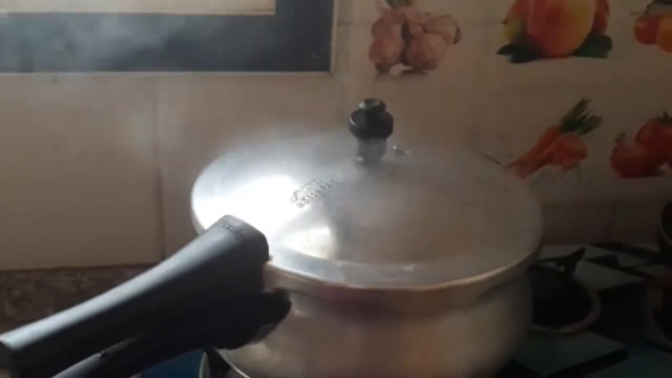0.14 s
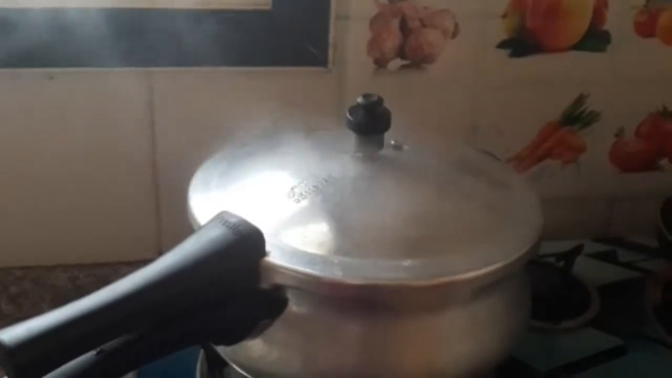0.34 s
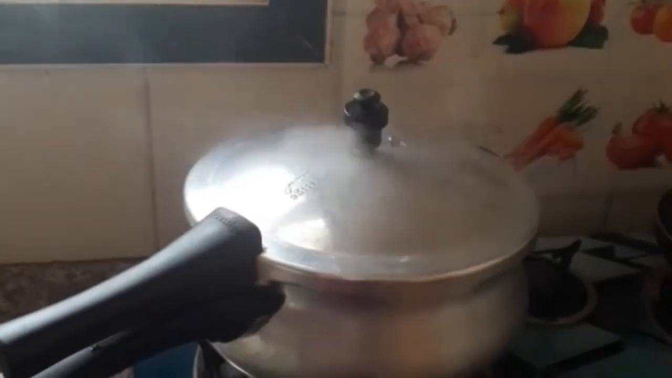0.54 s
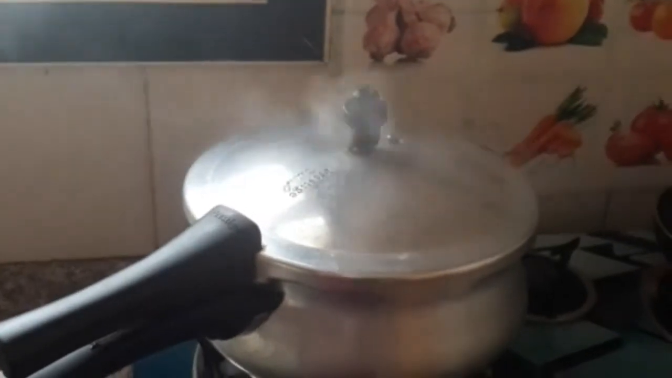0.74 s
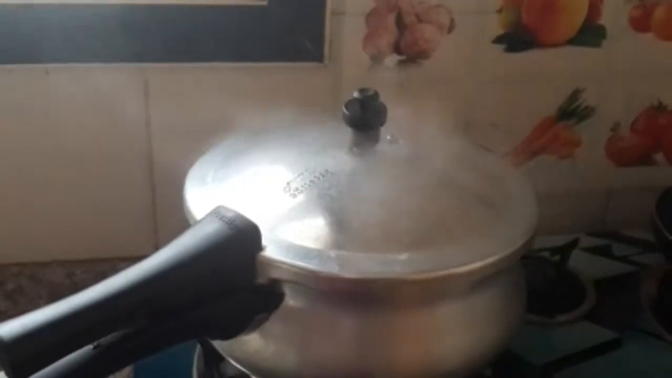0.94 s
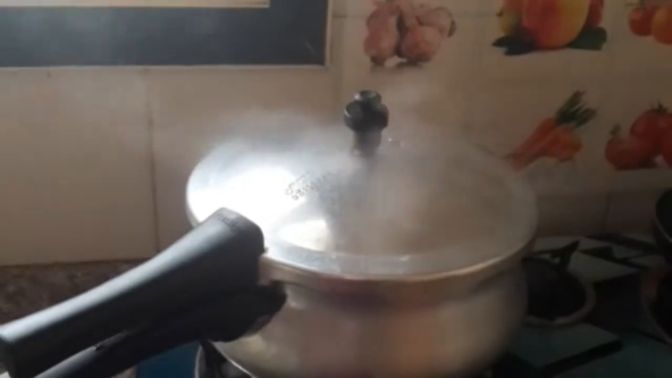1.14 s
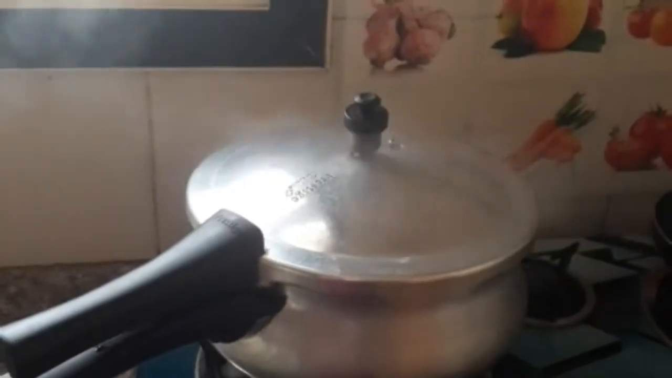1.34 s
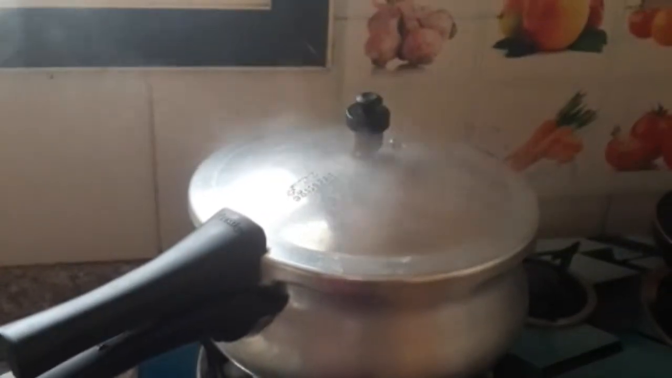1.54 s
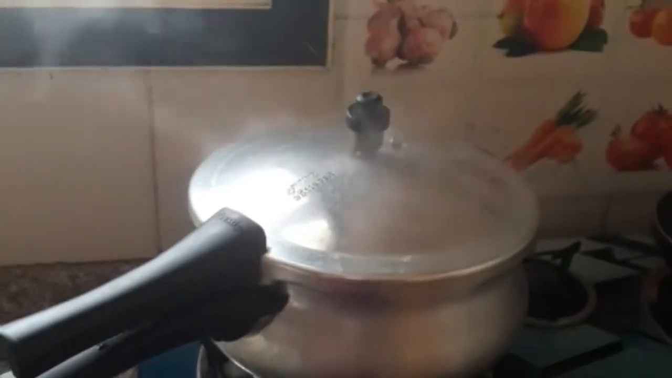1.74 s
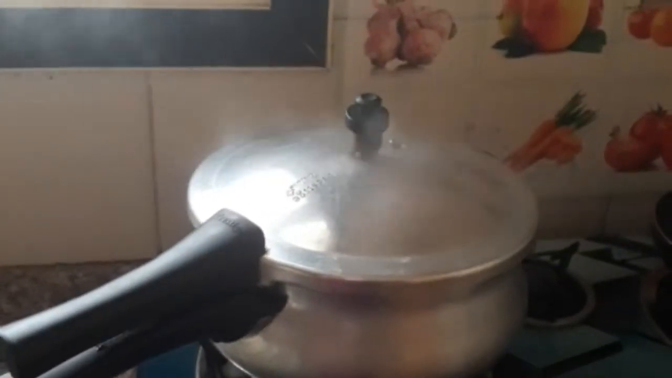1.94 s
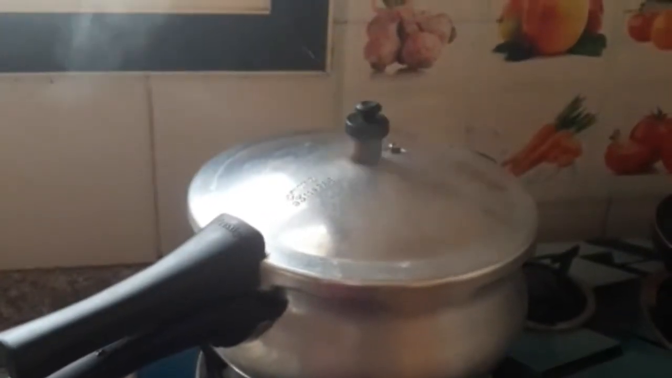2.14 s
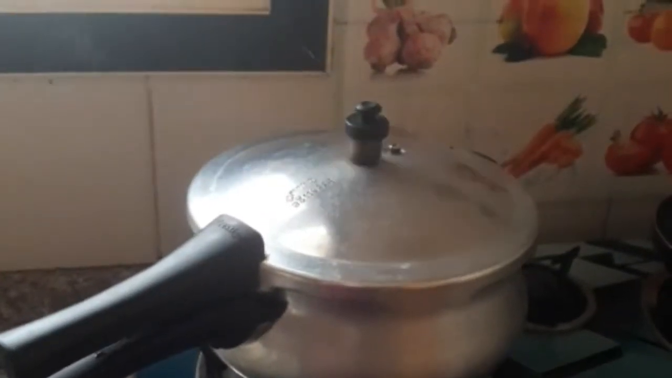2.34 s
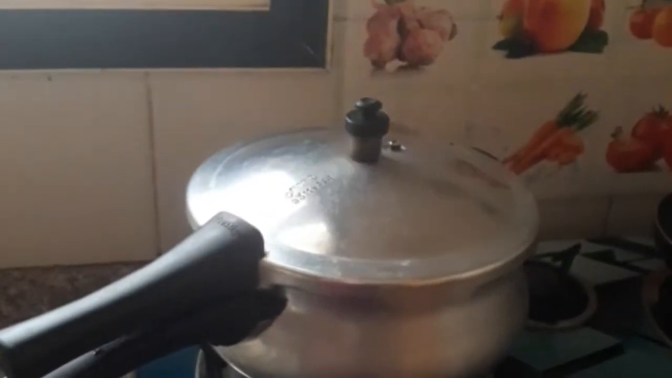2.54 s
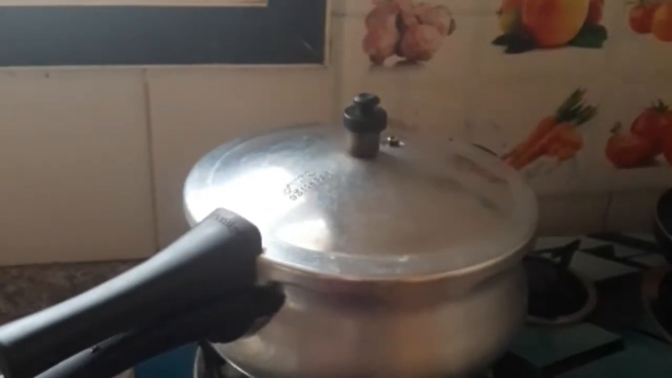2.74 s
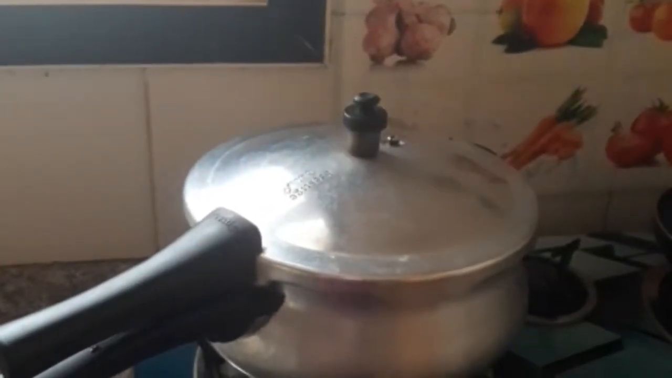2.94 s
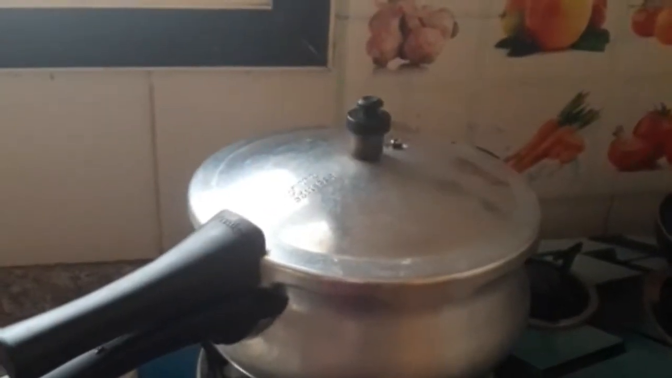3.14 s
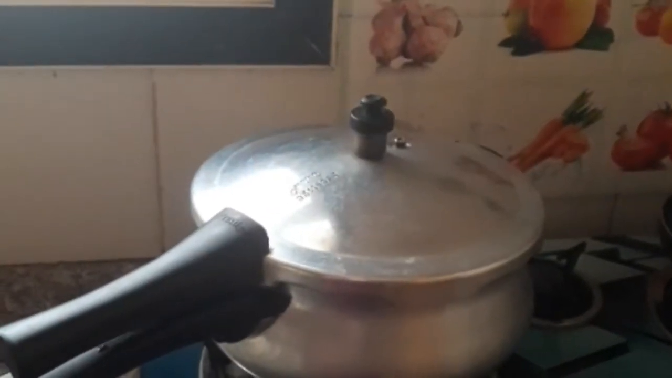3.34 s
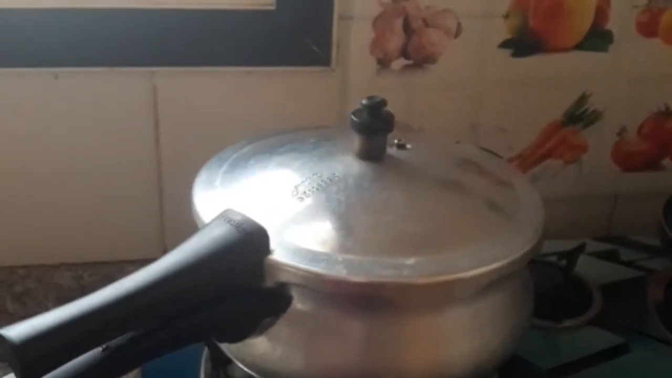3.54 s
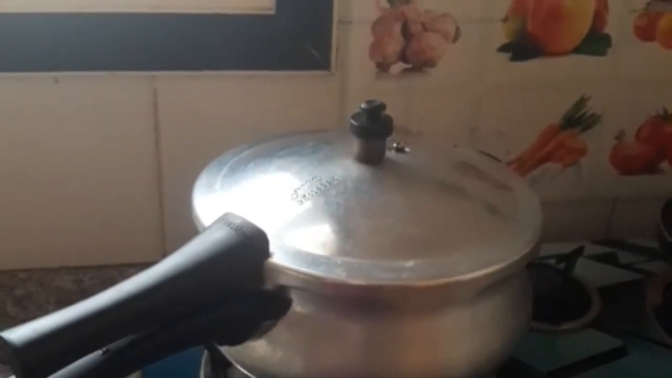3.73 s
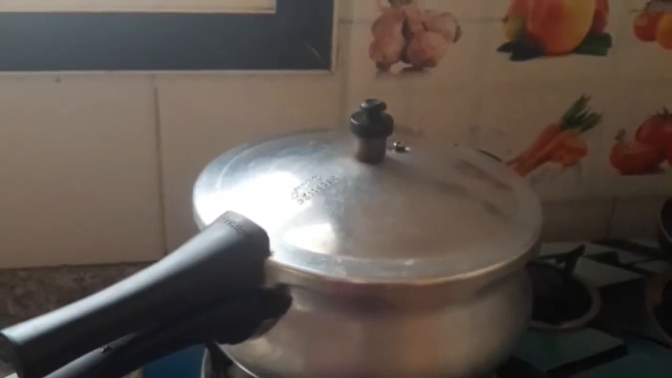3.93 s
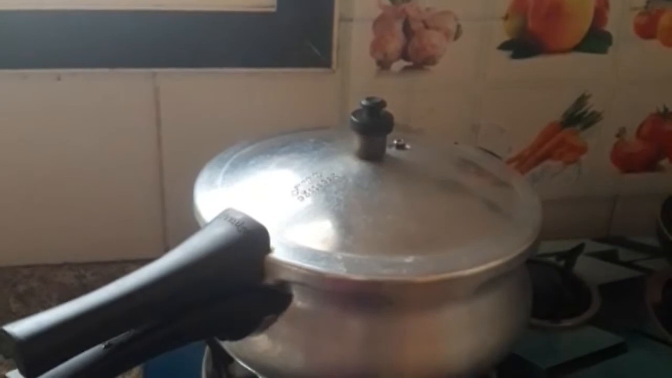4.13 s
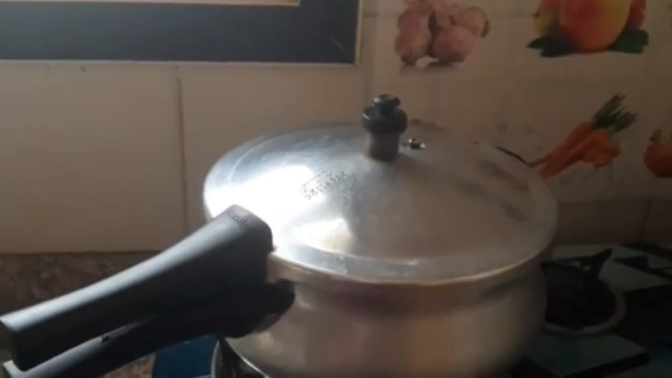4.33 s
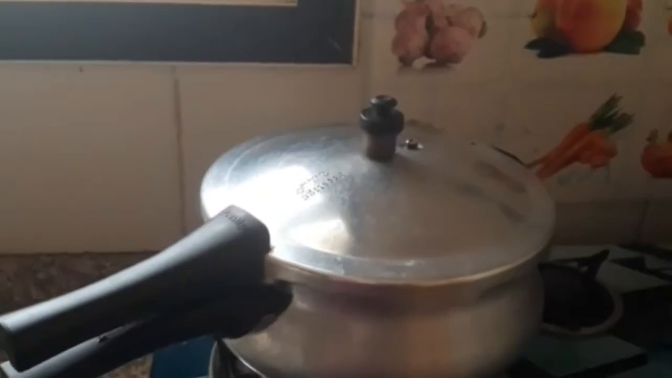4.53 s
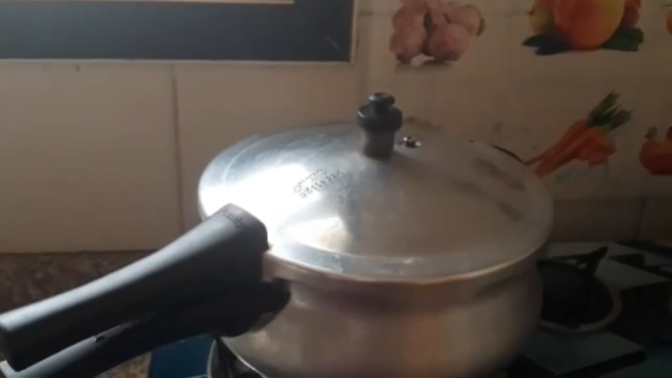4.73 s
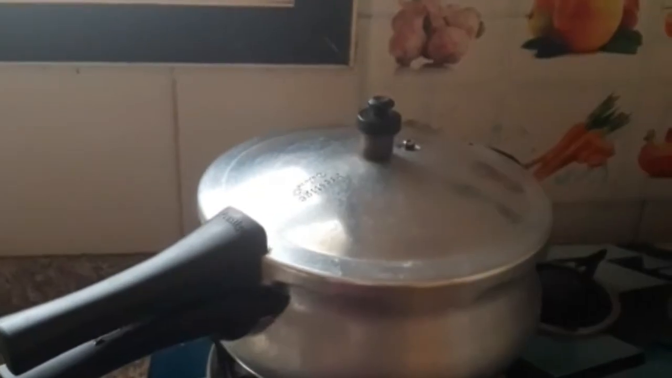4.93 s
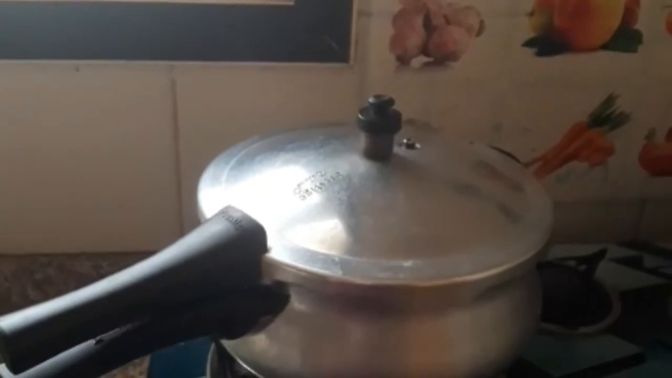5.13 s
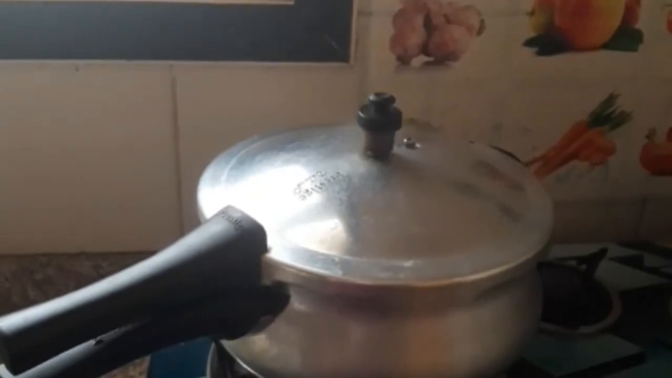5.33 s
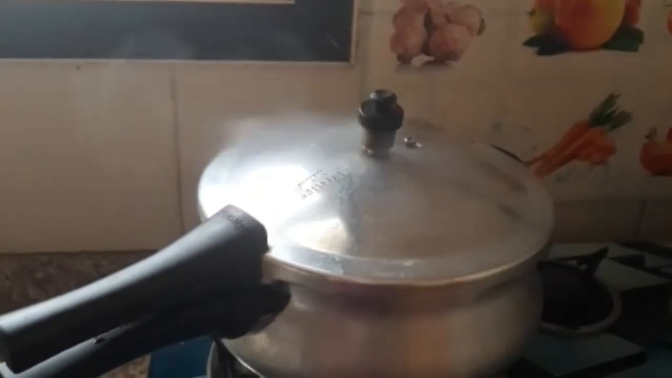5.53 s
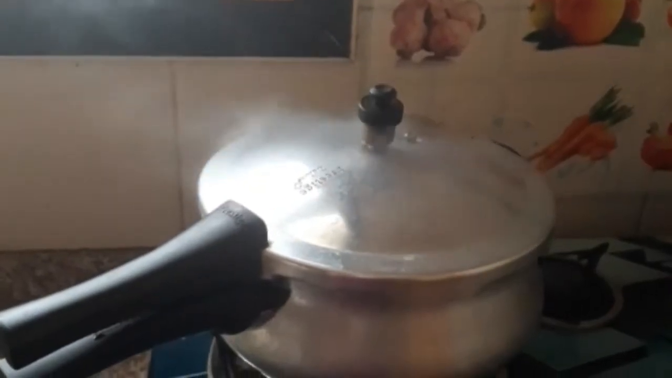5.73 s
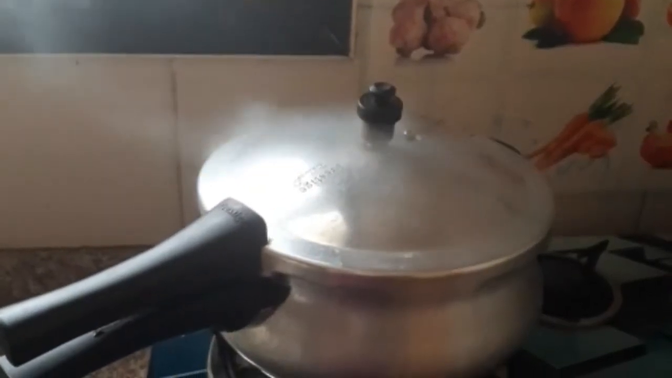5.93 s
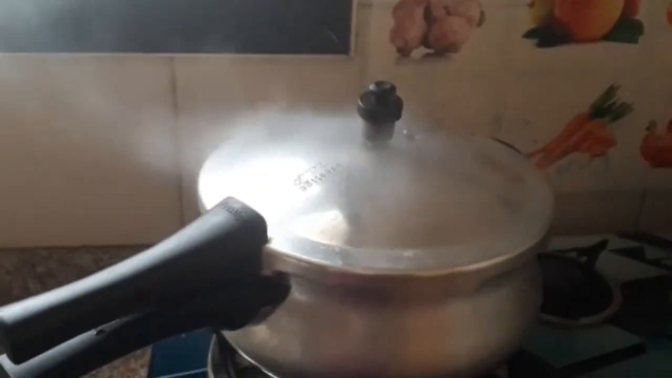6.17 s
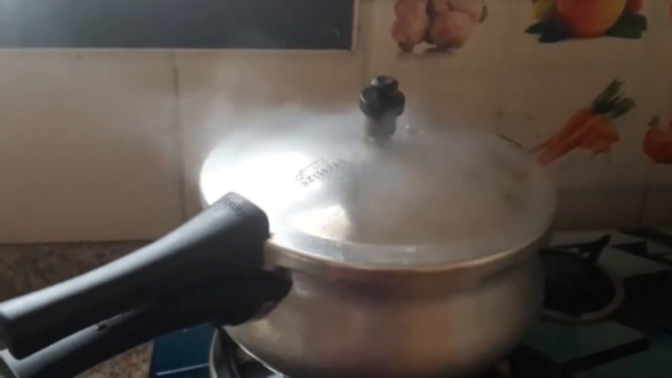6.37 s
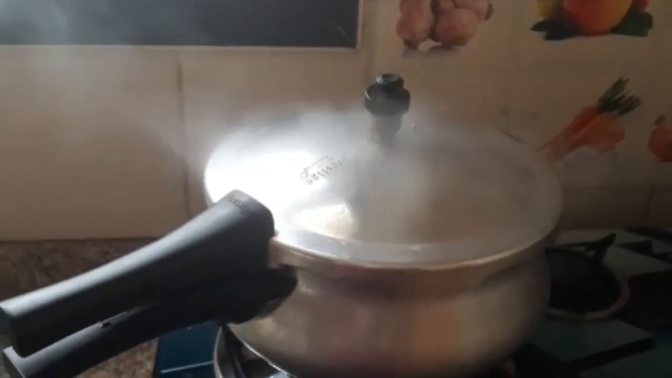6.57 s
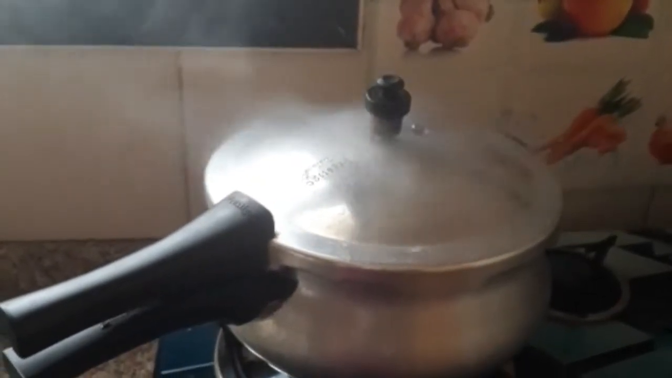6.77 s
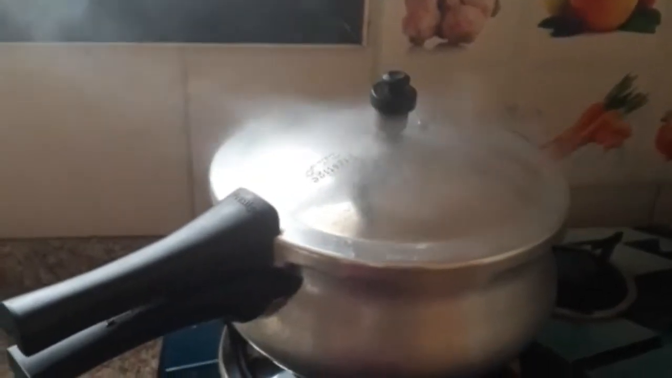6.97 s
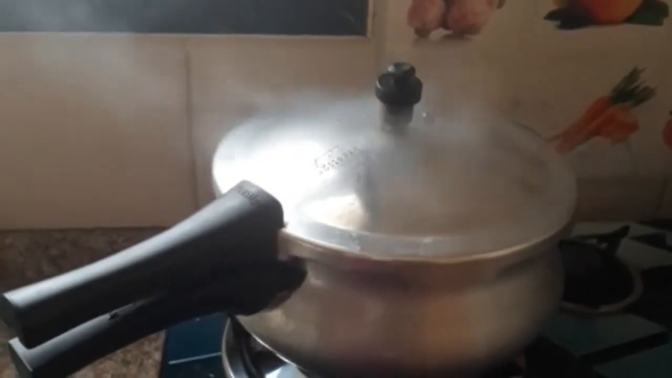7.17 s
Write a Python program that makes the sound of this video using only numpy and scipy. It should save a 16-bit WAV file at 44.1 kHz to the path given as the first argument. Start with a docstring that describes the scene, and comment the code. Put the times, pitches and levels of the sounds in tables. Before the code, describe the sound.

A stovetop pressure cooker blasts steam with a loud, hissing roar and a breathy whistle. The jet shuts off with a brief hoot and a puff, leaving a quiet simmer and a faint motor hum. A thin, wet hiss builds, then the jet bursts out again and keeps roaring, while droplets thump softly on the microphone, an arm's length away in a small tiled kitchen.

```python
"""A pressure cooker blows off steam in a small tiled kitchen. At first a turbulent jet roars through the
gaps of the vent weight, whose cavities resonate in a breathy whistle. Near 2 s the weight sinks with a
hoot and a puff, leaving the pot simmering over the burner and a faint motor hum. At 4.3 s wet steam
starts to leak under the weight; at 5.4 s it lifts again, and the jet roars to the end, spitting
droplets that thump on a microphone an arm's length away."""
import sys
import numpy as np
from scipy import signal
from scipy.fft import rfft, irfft
from scipy.io import wavfile
from scipy.ndimage import uniform_filter1d

SR = 44100
rng = np.random.default_rng(int(sys.argv[2]) if len(sys.argv) > 2 else 0)


def store_pcm(level_fs):
    """Save levels as 16-bit WAV."""
    pcm = np.round(np.clip(level_fs, -1, 1) * 32767).astype(np.int16)
    wavfile.write(sys.argv[1], SR, np.atleast_2d(pcm).T)


N = 317520
TIME = np.arange(N) / SR
FREQ = np.maximum(np.arange(N // 2 + 1) * SR / N, 1)

# lifts of the weight: open t/s, sinking t/s, jet level/dB,
# then relative to the jet: spray/dB, low rush/dB, treble tilt/dB, whistle/dB, tube tone/dB
LIFTS = [(-.6, 2.0585, -15.5, -20, -30, -1, -8, -16), (5.373, 7.5, -15, -15.5, -25, 0.6, -14, -18.5)]
# surges let out by the rocking weight: t/s, extra jet/dB, extra whistle/dB, extra tube tone/dB
SURGES = [(.03, 0.2, 0, 2), (1.14, 1.7, .3, 2), (1.58, 1.3, -1, 1.5), (1.93, 0.96, 2, 4.5),
          (6.35, 0.5, 2, -3), (7.19, 1.2, -1, -1)]
# hoots as the weight drops or the pressure sags, one per lift:
# peak t/s, level/dB, rise/(dB/s), fall/(dB/s), f/Hz, width/Hz
HOOTS = [(2.043, -28.5, 700, 100, 2190, 160), (7.05, -35.5, 3.5, 5, 2270, 259.5)]
# turbulence spectra: f/Hz, relative spectral level/dB
JET_SPECTRUM = [(20, -15.5), (100, -13), (400, -10.5), (1000, -10), (1700, -7.5), (3000, -4), (5000, -2),
                (7600, -0.5), (9600, -0.5), (11800, 0), (14000, -2.5), (16000, -5)]
LEAK_SPECTRUM = [(30, -26), (400, -5), (900, -10.5), (1700, 0.5), (3200, 0.5), (4700, -2.5), (7500, 3),
                 (10000, -1), (14000, 0.5), (16000, -9)]
SIMMER_SPECTRUM = [(25, -24), (40, 0), (60, 1.5), (130, -3), (230, 3), (450, -0.5), (950, -6), (1600, 1.5),
                   (2200, -1), (3000, -7), (4800, -8), (7200, -6), (10000, -10), (16000, -16)]
# resonances: f/Hz, width/Hz, level/dB relative to the turbulence
WEIGHT_MODES = [(1760, 290, -1.5), (2940, 350, -6.5), (7030, 250, 1.5), (8440, 370, 6), (8850, 280, 7),
                (9150, 270, 3), (10300, 450, -1.5)]
LEAK_MODES = [(3200, 350, -2), (4020, 500, 0), (5560, 340, 10), (5880, 290, 12.5), (6260, 320, 8.5),
              (8550, 600, 1.5), (11150, 500, 0)]
SIMMER_MODES = [(1660, 120, -7), (3800, 510, 7), (4010, 140, 12), (5560, 400, 3), (6150, 450, 7),
                (8700, 470, 4.5)]
# gap resonances of the whistle: f/Hz, width/Hz, relative level/dB
WHISTLE_MODES = [(5760, 500, -2.5), (6080, 240, 1), (6410, 290, -0.5)]
# droplet impacts: t/s, relative level/dB, push length/ms, direction (+1 or -1)
DROP_IMPACTS = [(5.4553, -21, 0.86, 1), (5.4923, -18, 0.61, 1), (5.599, -23, 1.2, 1),
                (5.638, -8.5, 0.66, 1), (5.9303, -10.5, 0.68, -1), (5.9709, -18, 0.55, 1),
                (6.1427, -12, 0.23, 1), (6.3878, -15, 0.46, 1), (6.407, -19.5, .8, -1),
                (6.5476, -18.5, 0.61, 1)]
# tones of a small motor in the room: f/Hz, level/dB relative to the simmering noise
MOTOR_TONES = [(167, -21), (231.5, -23), (587, -26)]
# early reflections from the lid and wall tiles: delay/ms, relative gain
REFLECTIONS = [(1.35, 0.03), (2.6, 0.038), (4.3, 0.049)]

OPEN_DB_PER_S, CLOSE_DB_PER_S = 288, 202  # slopes as the vent opens and is throttled


def vent():
    """Relief valve: at each lift one flow drives jet, whistle and tube tone; a hoot and puff join in."""
    out = 0
    for lift, hollow in zip(LIFTS, HOOTS):
        open_s, sink_s, jet_db, spray_db, rush_db, tilt_db, whistle_db, tube_db = lift
        # the whistle flares as the rising weight passes the gap that sings best
        flare_db = 10.5 * bump(open_s + .005, width_s=0.033)
        whistle = undb(whistle_db + flare_db) * surge(column=2) * vent_tone(WHISTLE_MODES, waver_db=0)
        tube = undb(tube_db) * surge(column=3) * vent_tone([(3920, 520, 0)], waver_db=0.5)
        blast = undb(jet_db) * flow(open_s, sink_s) * (jet(spray_db, rush_db, tilt_db) + whistle + tube)
        seated_s = sink_s + 0.12
        lifted = swell(open_s, OPEN_DB_PER_S, CLOSE_DB_PER_S, hold_s=seated_s - open_s)
        out = out + blast + lifted * hoot(*hollow) + puff(peak_s=sink_s + 0.055, level_db=-31.5)
    return out


def jet(spray_db, rush_db, tilt_db):
    """Jet noise: turbulence and spray excite the weight's cavities; large eddies add a low rush."""
    source = turbulence(flutter_db=0.85, flutter_hz=70) + undb(spray_db) * spray(per_s=2500, spread_db=6)
    tilt = spectrum([(4000, 0), (14000, tilt_db)])  # a higher lift lets out more treble
    roar = shaped(source, spectrum(JET_SPECTRUM) * tilt * (1 + resonance(WEIGHT_MODES)))
    rush = shaped(turbulence(flutter_db=5, flutter_hz=45), resonance([(220, 1500, 0)]))
    return roar + undb(rush_db) * rush


def flow(open_s, sink_s, sag_db_per_s=.5):
    """Valve transient: the jet's gain overshoots, sags with the pressure and is throttled shut."""
    opening = swell(open_s, OPEN_DB_PER_S, CLOSE_DB_PER_S, hold_s=sink_s - open_s)
    overshoot_db = 2.5 * bump(open_s + 0.042, width_s=0.027)
    sag_db = sag_db_per_s * np.maximum(TIME - open_s, 0)
    return opening * undb(overshoot_db - sag_db) * surge(column=1)


def surge(column):
    """Amplitude modulation by the rocking weight: gain of jet (column 1), whistle (2) or tube (3)."""
    return undb(sum(row[column] * bump(row[0], width_s=0.12) for row in SURGES))


def vent_tone(modes, waver_db):
    """Forced resonance: turbulence drives a breathy tone, which wavers by waver_db as the weight rocks."""
    tone = shaped(turbulence(flutter_db=1.2, flutter_hz=48), resonance(modes))
    return tone * undb(waver_db * walk(6.4))


def hoot(peak_s, level_db, rise_db_per_s, fall_db_per_s, hz, width_hz):
    """Cavity resonance: steam blows across the hollow of the weight."""
    tone = shaped(rng.standard_normal(N), resonance([(hz, width_hz, 0)]))
    return undb(level_db) * tone * swell(peak_s, rise_db_per_s, fall_db_per_s)


def puff(peak_s, level_db):
    """Throttling: the slowing jet loses its treble and turns hollow."""
    power = resonance([(750, 340, -2), (1300, 560, 1.5), (2500, 4500, -5.5)])
    breath = shaped(turbulence(flutter_db=4, flutter_hz=37), power)
    return undb(level_db) * breath * swell(peak_s, rise_db_per_s=130, fall_db_per_s=132)


def leak(start_s, end_s, level_db, growth_db_per_s, attack_s):
    """Orifice noise: wet steam sings near 6 kHz under the seated weight, growing with the pressure."""
    source = turbulence(flutter_db=1.5, flutter_hz=250) + undb(-9) * spray(per_s=440, spread_db=9)
    hiss = shaped(source, spectrum(LEAK_SPECTRUM) * (1 + resonance(LEAK_MODES)))
    age = np.clip(TIME - start_s, 0, end_s - start_s)
    # the weight nods on its seat in a damped oscillation
    nod_hz, crest_s, depth_db, settle_s = 3.3, 4.44, 3, 1.3
    nod_db = depth_db * np.exp(-age / settle_s) * np.cos(2 * np.pi * nod_hz * (TIME - crest_s))
    gap = np.minimum(age / attack_s, 1) * swell(end_s, 0, CLOSE_DB_PER_S)
    return hiss * gap * undb(level_db + growth_db_per_s * age + nod_db)


def droplets(port_hz, port_width_hz, gain_db):
    """Impulse response: each drop pushes on the microphone, and the air in its port swings back."""
    pushes = sum(np.sign(direction) * undb(db) * bump(s, width_s=ms / 2000)
                 for s, db, ms, direction in DROP_IMPACTS)
    port = -FREQ ** 2 / (port_hz ** 2 - FREQ ** 2 + 1j * FREQ * port_width_hz)
    return undb(gain_db) * irfft(rfft(pushes) * port, N)


def mist(start_s, end_s, per_s, level_db, fade_db):
    """Shot noise: finer drops patter on the microphone at random, ever more softly."""
    hits = (rng.random(N) < per_s / SR) * (rng.random(N) - .5)
    patter = unit(shaped(hits, resonance([(190, 360, 0)]) * spectrum([(40, -12), (120, -7)])))
    gain = undb(level_db - np.interp(TIME, [start_s, end_s], [0, fade_db]))
    return patter * gain * swell(start_s, OPEN_DB_PER_S, CLOSE_DB_PER_S, hold_s=end_s - start_s)


def simmer(level_db, rise_s):
    """Superposition of noise and tones: the burner's soft roar, the closed vent's hiss, a motor's hum."""
    power = spectrum(SIMMER_SPECTRUM) * (1 + resonance(SIMMER_MODES))
    noise = shaped(turbulence(flutter_db=.5, flutter_hz=40), power)
    hum = sum(np.sqrt(2) * undb(db + 2 * walk(3.7)) * np.sin(2 * np.pi * hz * TIME + 0.25 * walk(2.8))
              for hz, db in MOTOR_TONES)
    # the level is low until rise_s, then steps up, swells and levels off
    age = np.maximum(TIME - rise_s, 0)
    dip_db = 3 * np.maximum(1 - age / .045, 0) + 4.7 * np.exp(-age / 0.44)
    return (noise + hum) * undb(level_db - dip_db)


def kitchen(x, t60_s, room_db):
    """Reverberation: early reflections and a short exponential tail follow the direct sound."""
    t = TIME[:SR // 2]
    tail = rng.standard_normal(len(t)) * np.exp(-np.log(1000) * t / t60_s) * (t > .005)
    tail *= undb(room_db) / np.sqrt(np.sum(tail ** 2))
    early = sum(gain * np.exp(-2j * np.pi * FREQ * ms / 1000) for ms, gain in REFLECTIONS)
    highpass = FREQ / np.hypot(FREQ, 700)  # the bass stays dry
    response = 1 + highpass * (early + rfft(tail, N))
    return irfft(rfft(x) * response, N) / np.sqrt(1 + undb(room_db) ** 2)


def turbulence(flutter_db, flutter_hz):
    """Random modulation: white noise flutters as eddies pass."""
    return rng.standard_normal(N) * undb(flutter_db * walk(flutter_hz))


def spray(per_s, spread_db):
    """Atomisation: water torn apart in the jet gives tiny ticks of unequal size."""
    hits = rng.random(N) < per_s / SR
    return unit(hits * np.sign(rng.standard_normal(N)) * undb(spread_db * rng.random(N)))


def resonance(modes):
    """Modal sum: power response of steep-sided peaks given as (f/Hz, width/Hz, level/dB)."""
    return sum(undb(db) ** 2 / (1 + (1.56 * (FREQ - hz) / width) ** 2) ** 2 for hz, width, db in modes)


def spectrum(points):
    """Spectral envelope: power response through (f/Hz, level/dB) points."""
    hz, db = np.transpose(points)
    return undb(np.interp(np.log(FREQ), np.log(hz), db)) ** 2


def shaped(x, power):
    """Linear filtering by a power response, scaled so that white noise keeps its level."""
    return irfft(rfft(x) * np.sqrt(power / power.mean()), N)


def swell(peak_s, rise_db_per_s, fall_db_per_s, hold_s=0):
    """Exponential growth and decay: a gain that climbs to 1, holds and falls."""
    before_s = np.maximum(peak_s - TIME, 0)
    after_s = np.maximum(TIME - peak_s - hold_s, 0)
    return undb(-rise_db_per_s * before_s - fall_db_per_s * after_s)


def bump(peak_s, width_s):
    """Gaussian pulse of height 1."""
    return np.exp(-((TIME - peak_s) / width_s) ** 2 / 2)


def walk(rate_hz):
    """Smoothed random process: ramps between levels drawn rate_hz times a second."""
    hold = int(SR / rate_hz)
    steps = np.repeat(rng.standard_normal(N)[:N // hold + 1], hold)[:N]
    return 0.93 * uniform_filter1d(steps, hold)


def undb(db):
    """Amplitude ratio of a level in decibels."""
    return 10 ** (np.asarray(db) / 20)


def unit(x):
    """Normalisation to rms 1."""
    return x / np.sqrt(np.mean(x ** 2))


def scene():
    """Superposition: the cooker sounds through the room, the drops strike directly; both channels alike."""
    cooker = vent() + leak(start_s=4.329, end_s=5.36, level_db=-40, growth_db_per_s=8, attack_s=.004)
    cooker += simmer(level_db=-46, rise_s=2.67)
    splashes = droplets(port_hz=83, port_width_hz=73, gain_db=0.5)
    splashes += mist(start_s=5.45, end_s=6.7, per_s=60, level_db=-40, fade_db=12)
    mono = kitchen(cooker, t60_s=0.23, room_db=-9) + splashes
    return np.array([mono, mono])


def record(dry):
    """Saturation rounds the highest peaks, and a low-pass filter cuts the top of the treble."""
    ceiling, top_hz = .85, 15750
    rounded = dry / (1 + (dry / ceiling) ** 6) ** (1 / 6)
    return signal.sosfilt(signal.ellip(12, .2, 80, top_hz, fs=SR, output="sos"), rounded)


dry = scene()
out = record(dry)
store_pcm(out)
```